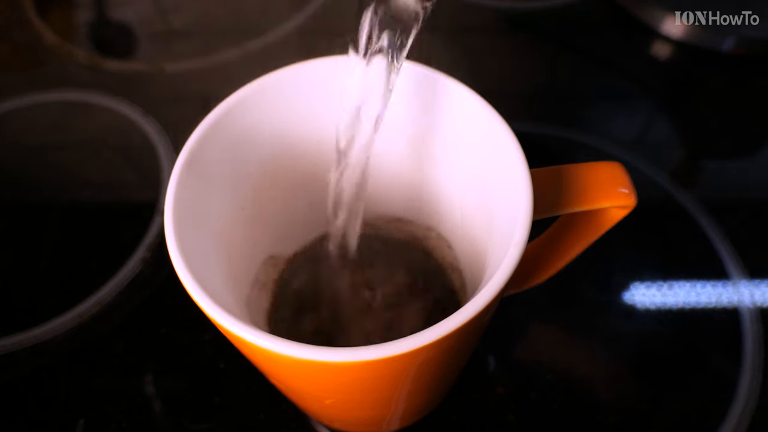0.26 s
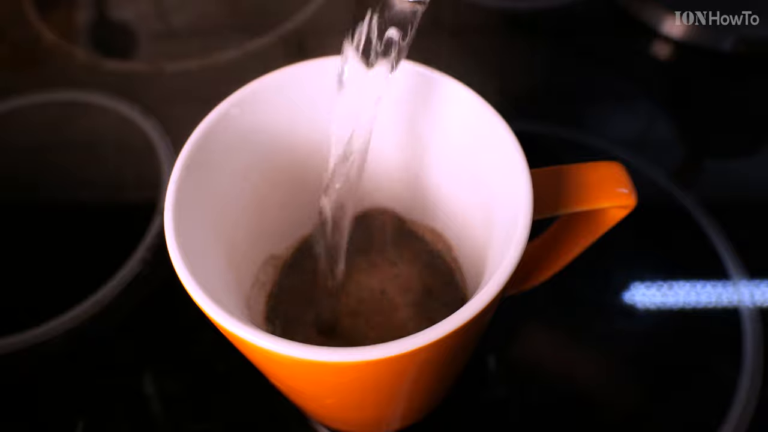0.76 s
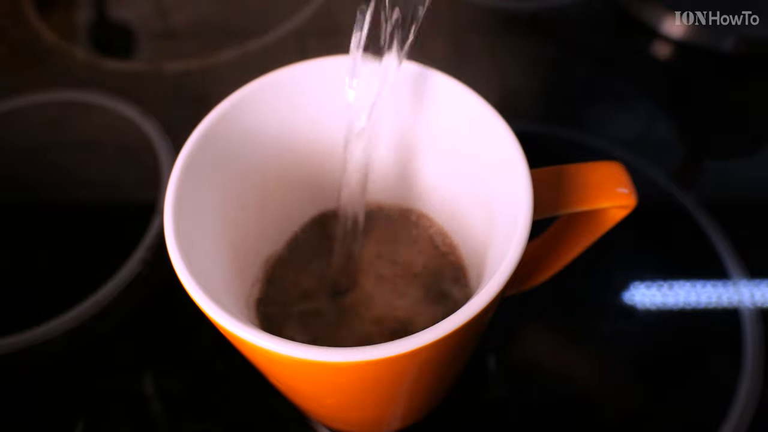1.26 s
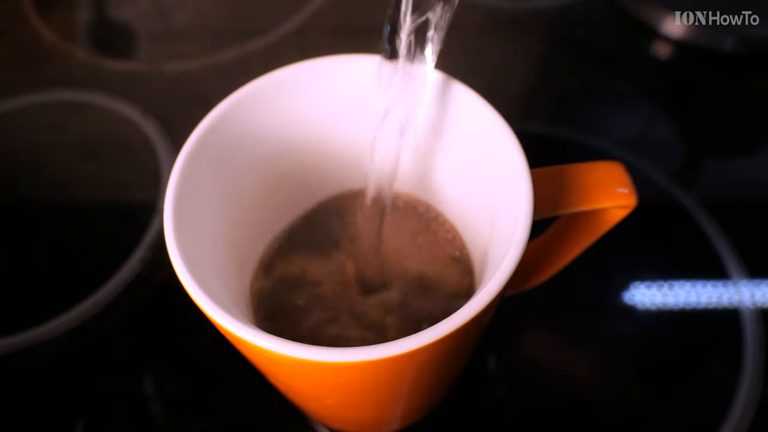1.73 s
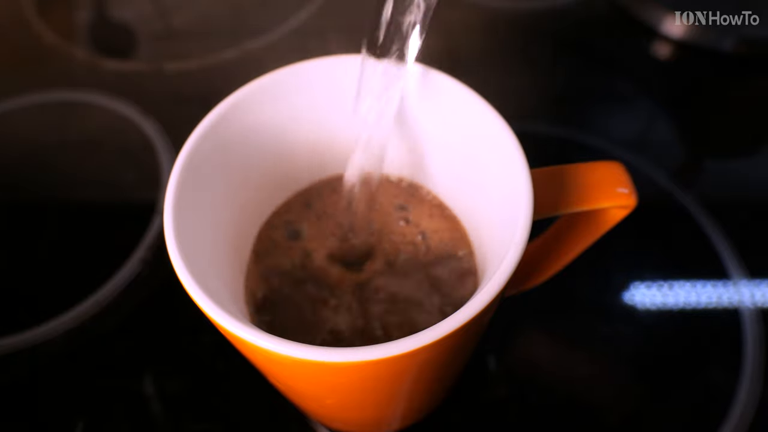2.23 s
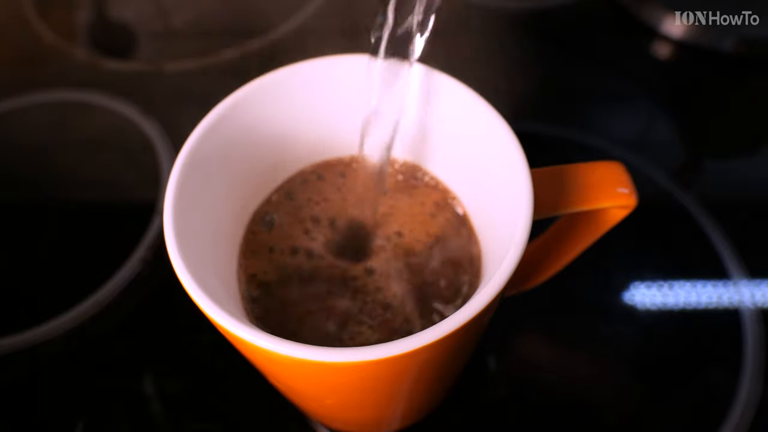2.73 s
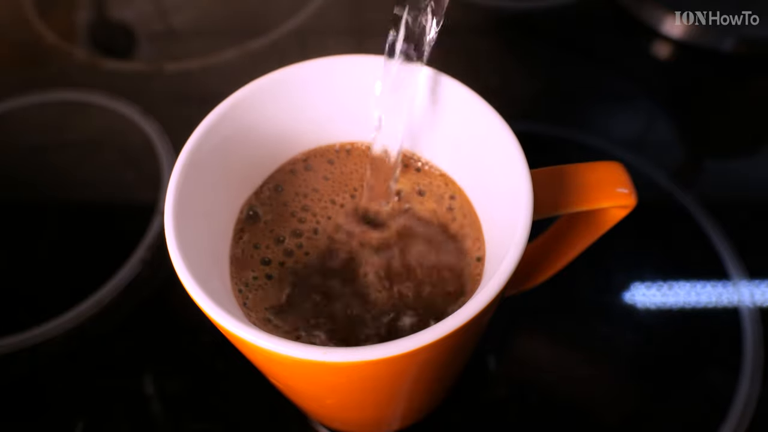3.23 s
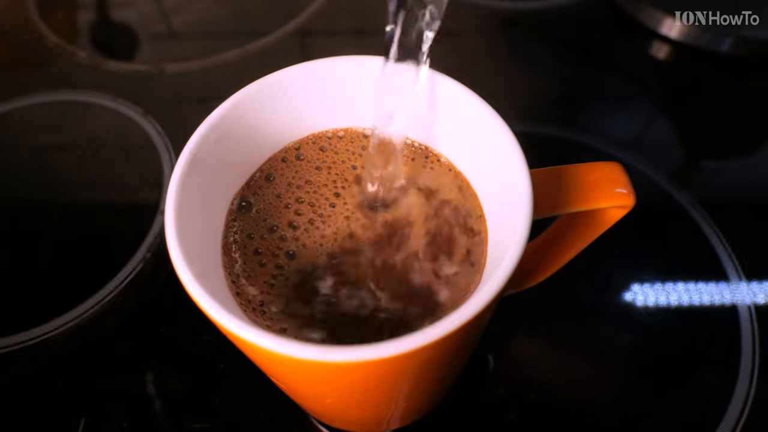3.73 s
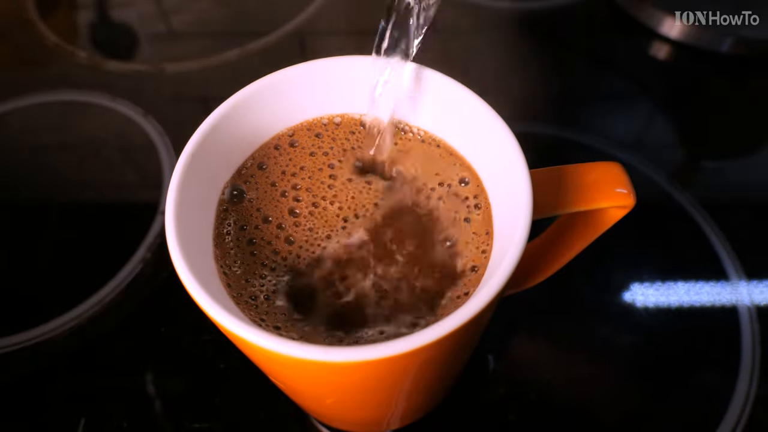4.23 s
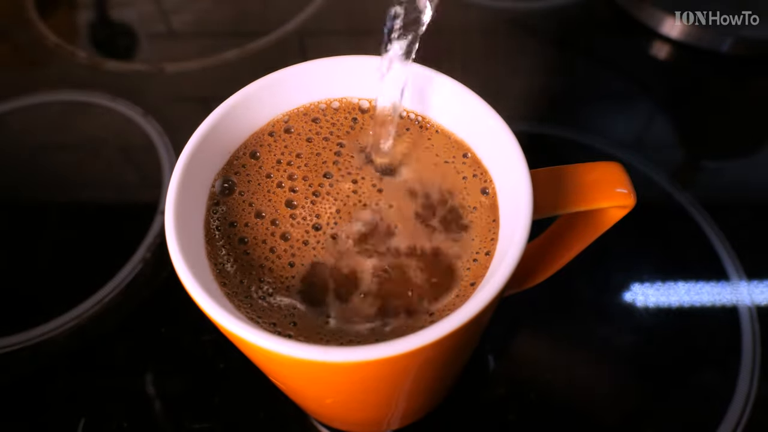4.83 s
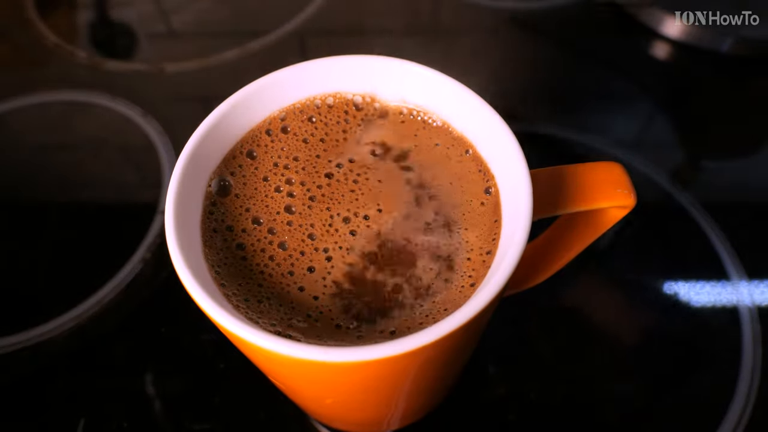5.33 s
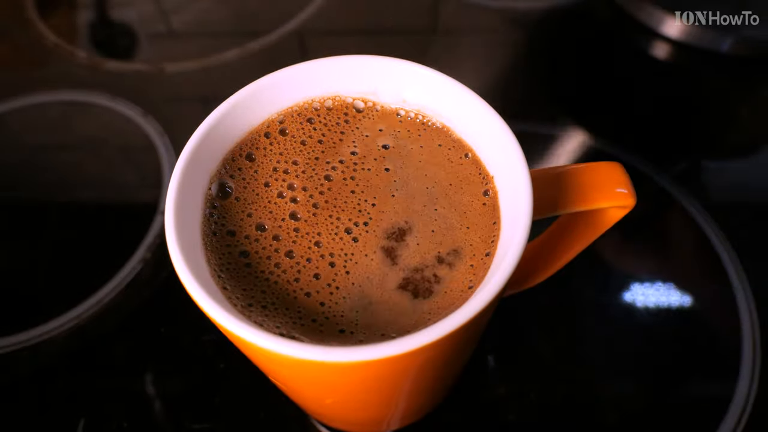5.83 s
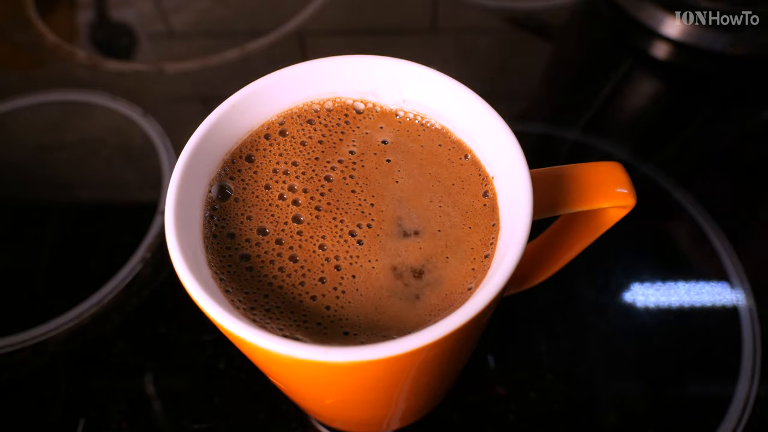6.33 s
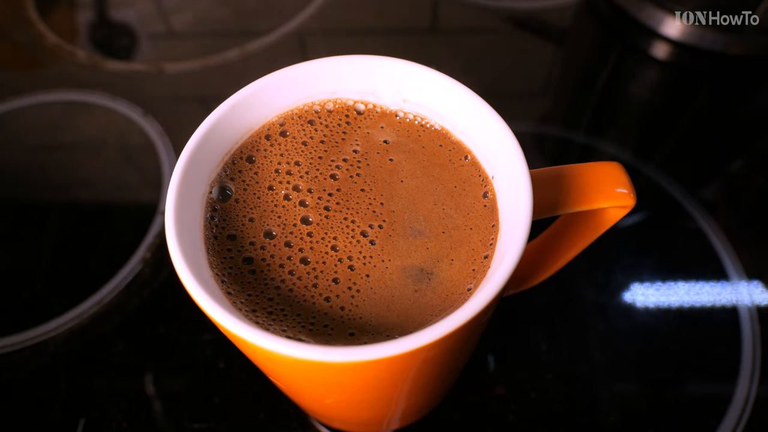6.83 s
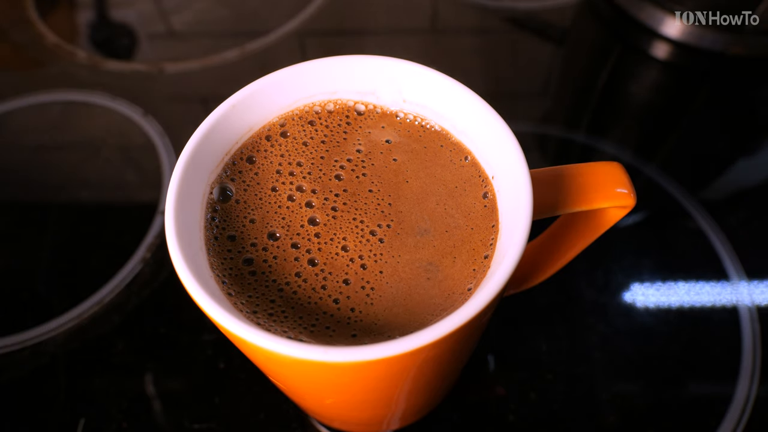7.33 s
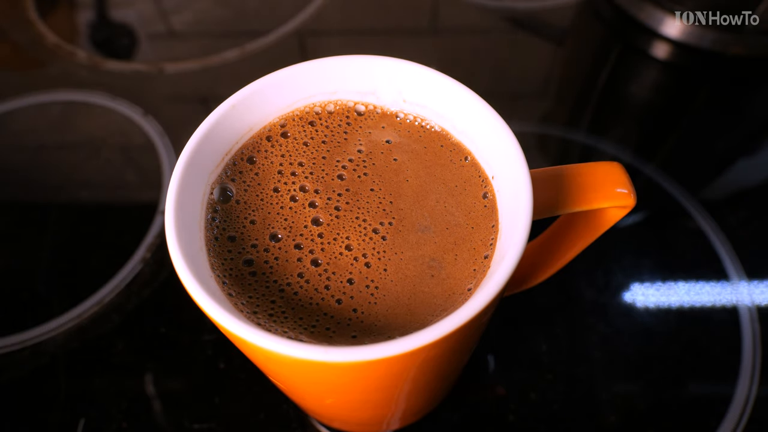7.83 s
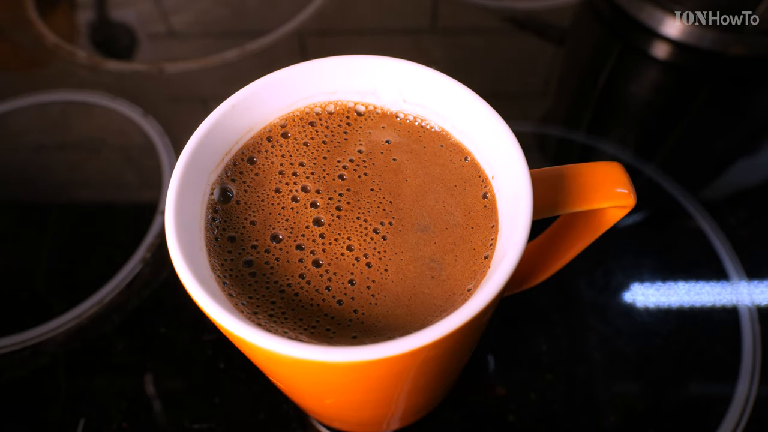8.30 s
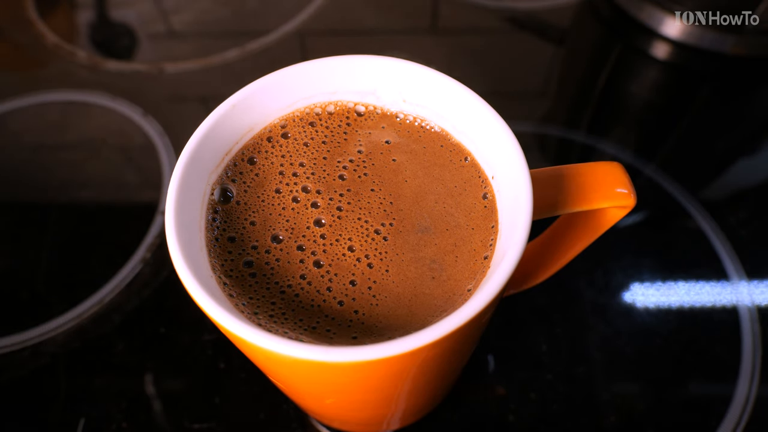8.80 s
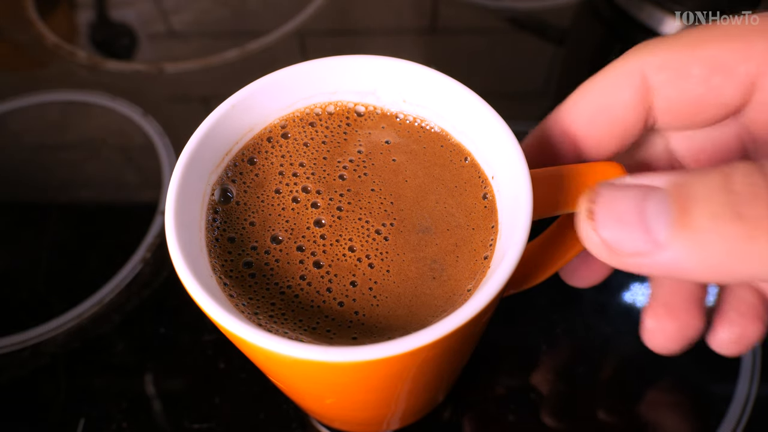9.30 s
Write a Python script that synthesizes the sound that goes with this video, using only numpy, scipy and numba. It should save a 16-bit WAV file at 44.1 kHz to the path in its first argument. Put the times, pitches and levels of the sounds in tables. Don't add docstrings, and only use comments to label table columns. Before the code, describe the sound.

Close to a ceramic mug in a kitchen, hot water pours in with bright splashes, plops and bubbling that climbs in pitch, softening to foamy fizz and small drips. The pour stops, water sloshes in the carried kettle, and it knocks and rattles down on its base. Cloth rustles afterwards while a deep appliance hum grows louder.

```python
import sys
import numpy as np
from scipy import signal
from scipy.fft import rfft, irfft
from scipy.io import wavfile
from numba import njit

SR = 44100
rng = np.random.default_rng(int(sys.argv[2]) if len(sys.argv) > 2 else 0)


def amplitude_ratio(level_db):
    exponent = np.asarray(level_db, float) / 20
    return 10 ** exponent


def transcribe(signal):
    frames = np.atleast_2d(signal).T
    limited = np.clip(frames, -1, 1)
    pcm = np.round(limited * 32767).astype(np.int16)
    wavfile.write(sys.argv[1], SR, pcm)


N = 421596
T_S = np.arange(N) / SR
WALL_HZ = 1100

# [f/Hz, density/dB]
HISS_SPECTRUM = [(82, -13), (140, 0), (264, -8.5), (402, -9.5), (490, -3.5), (563, -8), (759, -11),
                 (1130, -13.5), (1780, -16), (2050, -19.5), (8410, -27), (15000, -36.5), (16200, -40)]
# [f/Hz, left-right likeness]
LIKENESS = [(60, 1.0), (180, 0.54), (550, -0.55), (1650, -0.16), (4970, -0.12), (15000, 0.028)]
# [t/s, level/dB]
DRONE_LEVEL = [(0.0, -21), (0.08, -20), (1.78, -20), (2.82, -17.5), (2.88, -20.5), (3.91, -16), (4.13, -25),
               (4.21, -17), (5.75, -16.5), (6.02, -20.5), (6.63, -11), (6.65, -41), (6.71, -10.5),
               (7.03, -13.5), (7.11, -23.5), (7.32, -14.5), (9.4, -9), (9.56, -11.5)]
# [f/Hz, rms level/dB]
DRONE_PARTIALS = [(111.2, -46.5), (486, -52)]
# [t/s, length/s, level/dB]
SLEEVE_STROKES = [
    (5.963, 0.14, -48),
    (7.13, 0.046, -46),
    (7.415, 0.17, -51),
    (7.551, 0.08, -42),
    (7.702, 0.63, -39.5),
    (8.397, 0.21, -58),
    (9.258, 0.017, -40),
]
# [f/Hz, density/dB]
CLOTH_SPECTRUM = [(880, -44), (1500, -10), (1720, -6.5), (2080, -11), (2910, -9.5), (3770, -9),
                  (8160, -8.5), (14300, -18), (16000, -24)]
# [t/s, slosh level/dB]
SLOSH_LEVEL = [(5.3, -52), (5.37, -41), (5.52, -55), (5.66, -37), (5.71, -35), (5.82, -37.5), (5.9, -34.5),
               (5.98, -26.5), (6.08, -23), (6.26, -24), (6.73, -24.5), (7.03, -30.5), (7.32, -29),
               (9.56, -36)]
# [f/Hz, density/dB]
CARRIED_SPECTRUM = [(76, -9), (130, 0.5), (156, -10), (199, -0.5), (323, -4), (410, -22), (560, -8),
                    (730, -44)]
# [f/Hz, density/dB]
PARKED_SPECTRUM = [(76, 0.5), (130, -11.5), (156, -17.5), (204, -6.5), (295, -14), (339, -3.5),
                   (413, -16.5), (490, -20.5), (560, -27.5), (730, -64)]
# [f/Hz, density/dB]
RUB_SPECTRUM = [(290, -69), (500, 5), (728, -1.5), (820, 7.5), (920, 3), (1050, 2), (1220, -3.5),
                (1430, -5.5), (1850, -7.5), (2180, -12.5), (2420, -5), (2540, -8.5), (2680, -9.5),
                (5000, -21), (6500, -69)]
# [f/Hz, density/dB]
SETTLING_SPECTRUM = [(310, -20), (520, 8.5), (576, -35), (611, 1), (677, 0), (739, -3.5), (1040, -3),
                     (1150, 2.5), (1300, -8), (1520, -12), (1720, -13), (3000, -11.5), (3900, -18),
                     (5000, -50)]
# [f/Hz, density/dB]
BOOM_SPECTRUM = [(45, 10.5), (66, 10), (78, 4), (90, 11), (110, 0.5), (128, 1), (150, -16)]
# [t/s, base level/dB, clack f/Hz, shell level/dB, tick level/dB]
KNOCKS = [(6.187, -29, 790, -23, -47), (6.342, -8, 790, -3.5, -27), (6.425, 0, 2040, -6.5, -29),
          (6.537, -13.5, 656, -1.5, -25), (6.574, -8.5, 856, -9.5, -28), (6.619, -17, 1650, -13, -17.5),
          (6.668, -23, 820, -19, -28.5), (6.69, -18, 850, -16, -38), (6.721, -11, 700, -26, -43),
          (6.801, -14.5, 670, -20, -47), (6.868, -14, 1470, -46, -12.5), (6.925, -8.5, 1550, -13.5, -24.5),
          (7.015, -11.5, 840, -21, -54), (7.077, -17.5, 686, -23.5, -24), (7.13, -23, 683, -23, -28),
          (7.209, -24, 1190, -25, -29)]
# [t/s, peak level/dB, f/Hz]
BOUNCES = [(5.699, -27.5, 826), (6.199, -22.5, 2500), (6.283, -23, 830), (6.351, -18, 803),
           (6.439, -19, 900), (6.585, -18, 630), (6.692, -14, 1050), (6.811, -20.5, 715),
           (6.884, -16.5, 2900), (6.938, -24, 1020), (7.029, -31, 685), (7.859, -34, 2060),
           (8.249, -26, 1800)]
# [f/Hz, level/dB, t60/s]
SHELL_MODES = [(293, -11, 0.22), (326.8, -4.5, 0.21), (446, -9, 0.074)]
# [f/Hz, level/dB, t60/s]
BASE_MODES = [(760, -1, 0.07), (1050, -3, 0.028), (1550, -11, 0.024), (2370, -31, .015)]
# [f/Hz, level/dB, t60/s]
HOLLOW_MODES = [(346, 2.5, 0.079), (920, -7, 0.026), (1545, -7.5, 0.021), (2350, -31, 0.014)]
# [f/Hz, level/dB, t60/s]
THUMP_MODES = [(174, -4, 0.054), (84, -2.5, 0.098)]
# [t/s, f/Hz]
COLUMN_HZ = [(0, 680), (.8, 836), (1.3, 1140), (2.0, 1200), (2.6, 1450), (3.2, 1570), (4.0, 1790),
             (5.5, 1670)]
# [t/s, f/Hz]
OVERTONE_HZ = [(0, 8600), (1.7, 8150), (2.8, 6850), (4.0, 6500), (5.5, 5770)]
# [t/s, level/dB]
MUG_DRIVE = [(0, -11), (1.5, -12), (2.0, -43), (5.5, -28)]
# [f/Hz, level/dB, t60/s]
MUG_MODES = [(3280, 12, 0.04), (4400, 8, 0.03), (4980, 6, 0.05), (5430, 6, 0.05)]
# [f/Hz, level/dB, t60/s]
MOUTH_MODES = [(562, -3.5, 0.026), (1122, -7.5, 0.073), (1540, 5, 0.021), (1800, 0, 0.031)]
# [f/Hz, density/dB]
SPRAY_SPECTRUM = [(1180, -42), (2000, 4.5), (3010, 4.5), (3280, 9.5), (5680, 5), (6880, 3), (9830, -0.5),
                  (16000, -6)]
# [f/Hz, density/dB]
FIZZ_SPECTRUM = [(1180, -29), (2000, 2), (3010, 4), (3680, 11), (4730, 2.5), (6820, 6), (9830, 3.5),
                 (11300, -2.5), (14700, 1), (16000, -13)]
# [t/s, column level/dB, body level/dB, splash level/dB]
PLOPS = [(0.098, -16, -44, -24), (0.167, -14.5, -10.5, -14.5), (0.197, -14, -7.5, -13.5),
         (0.416, -20, -26, -25), (0.702, -25, -10, -26), (0.906, -19, -41, -26), (1.167, -18.5, -8.5, -20),
         (1.336, -13.5, -10, -14), (1.464, -12, -14, -24.5), (1.566, -18, -17, -27.5),
         (1.584, -19, -26, -27), (2.016, -26, -26, -29.5), (2.182, -23.5, -43, -40),
         (2.211, -16.5, -13, -37), (2.331, -19.5, -26.5, -51), (2.439, -17, -18, -28),
         (2.517, -18.5, -30, -27), (2.559, -15.5, -30, -31), (2.612, -10, -15, -22.5),
         (2.679, -17, -29, -34.5), (2.782, -26, -47, -42), (3.064, -27, -43, -39), (3.123, -27, -46, -30.5),
         (3.63, -17, -26, -27), (3.906, -23.5, -26, -32), (3.988, -29, -23.5, -35.5),
         (4.019, -23.5, -26, -31), (5.05, -29.5, -36, -36), (5.107, -27.5, -26.5, -29.5),
         (5.239, -31, -29.5, -35)]
# [t/s, body level/dB, bubble f/Hz]
GLUGS = [(0.368, -16.5, 508), (0.463, -26.5, 526), (0.51, -19.5, 480), (0.606, -24, 537),
         (0.99, -22.5, 503), (1.897, -22, 535), (1.927, -24, 450), (1.949, -25, 526), (2.158, -24.5, 549),
         (2.834, -18, 513), (3.849, -41, 448)]
# [t/s, peak level/dB]
DRIPS = [(0.766, -23), (0.8, -23), (1.712, -19), (1.781, -23), (1.8505, -22), (4.2437, -30), (4.329, -34),
         (4.4127, -35), (4.4958, -28.5), (4.5334, -31.5), (4.58, -29), (4.6183, -34), (4.6596, -32),
         (4.7285, -31), (4.7492, -34), (4.834, -34), (4.8785, -32.5)]
# [t/s, peak level/dB, f/Hz]
SNAPS = [(1.5298, -29, 3300), (1.726, -37, 7420), (1.9926, -31, 9890), (2.258, -26.5, 9890),
         (2.3454, -33, 9530), (2.397, -21.5, 5300), (2.4085, -24, 3480), (2.4681, -33, 9560),
         (3.1634, -28.5, 7000), (3.1945, -29, 10700), (3.358, -25, 3820), (3.367, -17.5, 3870),
         (3.429, -27.5, 3840), (3.7763, -28, 7330), (3.811, -23.5, 6200), (4.15, -30, 2920),
         (4.2116, -15, 3500), (4.289, -23.5, 3820), (4.384, -33, 6470), (4.7199, -25.5, 6940),
         (5.107, -37, 2640), (5.226, -31, 4360)]
# [t/s, peak level/dB, f/Hz]
FLUNG = [(0.035, -9, 5100), (0.083, -14, 4900), (0.1111, -4.5, 6900), (0.123, -13, 4160),
         (0.2648, -31, 3260), (0.3087, -16.5, 3280), (0.3421, -27, 3290), (0.3597, -8, 3460),
         (0.4274, -11, 3270), (0.4617, -19, 3290), (0.52, -20, 3360), (0.607, -14.5, 3260),
         (0.63, -24, 3260), (0.7425, -18, 3280), (0.768, -15, 3380), (0.7983, -15, 3290),
         (0.831, -21, 3200), (0.845, -34, 3320), (0.939, -20.5, 3140), (0.9697, -26, 4360),
         (0.99, -26, 3260), (1.0889, -26, 3200), (1.15, -21, 3600), (1.2125, -22, 4930), (1.229, -19, 3220),
         (1.391, -14, 4400), (1.698, -22.5, 3380)]
# [t/s, peak level/dB, f/Hz]
BLIPS = [(0.009, -13, 780), (0.036, -9, 610), (0.107, -2.5, 775), (0.3, -15, 770), (0.369, -26, 500),
         (0.394, -21, 497), (0.427, -5, 840), (0.479, -9, 546), (0.534, -19, 890), (0.844, -12, 580),
         (0.949, -14, 1070), (1.254, -23, 1090), (1.314, -23, 1130), (1.394, -13, 730), (1.497, -8, 1040),
         (1.549, -14, 1090), (1.646, -13.5, 1050), (1.746, -14, 1120), (1.833, -9.5, 1070),
         (1.993, -12, 1120), (2.103, -12.5, 1140), (2.129, -20, 580), (2.261, -23, 619), (2.304, -17, 1080),
         (2.377, -8.5, 1310), (2.469, -12.5, 1070), (2.547, -13, 1550), (2.718, -25, 1520),
         (2.798, -11, 1730), (2.948, -13, 1540), (3.036, -23, 513), (3.459, -14, 1693), (3.52, -26, 415),
         (3.575, -25, 500)]
# [t/s, peak level/dB, f/Hz]
POCKETS = [(1.171, -19.5, 90), (1.194, -34, 292), (1.345, -14, 99), (1.352, -22, 200), (1.41, -19, 80),
           (1.586, -21, 293), (1.785, -23, 294), (1.815, -21, 306), (1.847, -18, 262), (1.87, -18, 89.5),
           (1.947, -28, 86.6), (2.175, -26, 94), (2.345, -25, 294), (2.399, -26, 290), (2.549, -27, 260)]
# [t/s, peak level/dB]
BEADS = [(0.358, -33), (0.393, -19), (0.673, -25), (0.784, -22), (2.127, -22), (2.277, -24), (2.751, -24),
         (2.872, -24), (2.9194, -42), (2.947, -37), (2.9911, -35), (3.037, -19.5), (3.1394, -21),
         (3.1677, -28), (3.249, -35), (3.276, -21), (3.324, -21), (3.347, -33), (3.385, -33), (3.4032, -21),
         (3.485, -22), (3.5387, -19.5), (3.5817, -20.5), (3.6088, -31), (3.674, -21), (3.6905, -27),
         (3.708, -25), (3.7334, -23), (3.8046, -28), (3.8284, -22), (3.848, -20.5), (3.9293, -27),
         (3.9383, -21.5), (4.0831, -34), (4.144, -31), (4.288, -33), (4.39, -28), (4.456, -31),
         (4.687, -35), (5.21, -37), (5.1394, -40), (5.2889, -43)]


def rms_one(x):
    return x / np.sqrt(np.mean(x ** 2) + 1e-20)


def curve(rows, at_s=T_S):
    return np.interp(at_s, *np.transpose(rows))


def fade(start_s, end_s):
    return np.interp(T_S, [start_s, end_s], [0, 1])


def sounding(start_s, end_s):
    return np.interp(T_S, [start_s - .06, start_s, end_s, end_s + .06], [0, 1, 1, 0])


def at_hz(points, hz):
    f_hz, value = np.transpose(points)
    return np.interp(np.log(hz), np.log(f_hz), value)


def band(x, low_hz, high_hz):
    return signal.sosfilt(signal.butter(2, [low_hz, high_hz], "band", fs=SR, output="sos"), x + 1e-18)


def drift(rate_hz):
    r = np.exp(-2 * np.pi * rate_hz * 40 / SR)
    slow = signal.lfilter([1], [1, -2 * r, r * r], rng.standard_normal(N // 40 + 2002))
    slow = rms_one(slow[2000:])
    return np.interp(np.arange(N) / 40, np.arange(len(slow)), slow)


def coloured(spectrum, channels=1):
    hz = np.arange(1, N // 2 + 2) * SR / N
    inside = (hz > spectrum[0][0]) & (hz < spectrum[-1][0])
    mid, side = rfft(rng.standard_normal((2, N))) * amplitude_ratio(at_hz(spectrum, hz)) * inside
    if channels == 1:
        return rms_one(irfft(mid, N))
    alike = np.clip(at_hz(LIKENESS, hz), -1, 1)
    both = np.sqrt(1 + alike) * mid + np.sqrt(1 - alike) * side * [[1], [-1]]
    return rms_one(irfft(both, N))


def ring(clicks, hz, t60_s):
    r, w = amplitude_ratio(-60 / (t60_s * SR)), 2 * np.pi * hz / SR
    return signal.lfilter([0, np.sin(w)], [1, -2 * r * np.cos(w), r * r], clicks + 1e-18)


def struck(events, modes, level_db, scatter_db):
    at = (np.array(events)[:, 0] * SR).astype(int)
    out = np.zeros(N)
    strengths = rng.normal(0, 1, (len(at), len(modes)))
    for k, (hz, db, t60_s) in enumerate(modes):
        clicks = np.zeros(N)
        clicks[at] = amplitude_ratio(level_db + db + scatter_db * strengths[:, k])
        out += ring(clicks, hz, t60_s)
    return out


def pings(events, level_db, cycles, rise, detune):
    t_s, out = np.arange(2048) / SR, np.zeros(N + 2048)
    for row, db in zip(events, level_db):
        turns = row[2] * detune * t_s
        shape = amplitude_ratio(db - 60 * turns / cycles) * (1 - np.exp(-2 * turns))
        tone = np.sin(2 * np.pi * turns * (1 + rise * turns))
        out[round(row[0] * SR):][:len(t_s)] += shape * tone
    return out[:N]


def bursts(events, level_db, t60_s, tail_db):
    t_s, out = np.arange(2048) / SR, np.zeros((2, N + 2048))
    noise = rng.standard_normal((len(events), 3, len(t_s)))
    tails = amplitude_ratio(tail_db) * (noise[:, :1] + 1.67 * noise[:, 1:]) * amplitude_ratio(-60 * t_s / t60_s)
    tails[:, :, 0] = 1
    for row, db, tail in zip(events, level_db, tails):
        out[:, round(row[0] * SR):][:, :len(t_s)] += amplitude_ratio(db) * tail
    return out[:, :N]


def grains(per_s, spread_db):
    born = rng.random(N) < per_s / SR
    size = amplitude_ratio(spread_db * np.minimum(rng.exponential(1, N), 4))
    return born * size * rng.choice([-1, 1], N)


def dealt_to(clicks, pitches_hz, cycles):
    dealt = rng.integers(0, len(pitches_hz), N)
    return sum(ring(clicks * (dealt == k), hz, cycles / hz) for k, hz in enumerate(pitches_hz))


@njit
def moving_resonance(x, hz, r, sr):
    out = np.zeros(len(x))
    for i in range(2, len(x)):
        feedback = 2 * r * np.cos(2 * np.pi * hz[i] / sr) * out[i - 1] - r * r * out[i - 2]
        out[i] = x[i] - x[i - 2] + feedback
    return out


def resonate(x, hz, width_hz):
    r = np.exp(-np.pi * width_hz / SR)
    return np.array([moving_resonance(v, hz, r, SR) for v in x])


def heard_from(x, lag_ms, smear):
    late = np.arange(N) - np.array([[max(lag_ms, 0)], [max(-lag_ms, 0)]]) * SR / 1000
    out = [np.interp(at, np.arange(N), v) for at, v in zip(late, x * np.ones((2, 1)))]
    for k, lag in enumerate([11, 17, 41, 29]):
        echo = np.r_[1, np.zeros(lag - 1), smear]
        out[k % 2] = signal.lfilter(echo[::-1], echo, out[k % 2])
    return np.roll(out, -49, axis=1)


def hiss():
    return amplitude_ratio(-39 + 2.0 * drift(0.49)) * coloured(HISS_SPECTRUM, channels=2)


def drone():
    level_db = curve(DRONE_LEVEL) + 0.3 * drift(4)
    turn = 2 * np.pi * 37.47 * T_S + 0.37 * drift(3.2)
    out = np.sqrt(2) * amplitude_ratio(level_db) * np.sin(turn + np.array([[-.04], [.04]]))
    for hz, db in DRONE_PARTIALS:
        out = out + np.sqrt(2) * amplitude_ratio(db + 1.0 * drift(1.4)) * np.sin(2 * np.pi * hz * T_S)
    return out


def sleeve():
    attack_s, release_s = 0.017, 0.063
    level = amplitude_ratio(-44) * fade(5.52, 6.02)
    for s, length_s, db in SLEEVE_STROKES:
        end_s = s + length_s
        level = level + amplitude_ratio(db) * (fade(s - attack_s, s) - fade(end_s, end_s + release_s))
    return level * amplitude_ratio(1.28 * drift(8.9)) * coloured(CLOTH_SPECTRUM, channels=2)


def spout_squeak():
    start_s, end_s, hz, db = 9.3, 9.46, 628, -44
    swell = fade(start_s, start_s + 0.042) * (1 - fade(end_s, end_s + 0.075))
    return np.sqrt(2) * swell * amplitude_ratio(db + drift(9.1)) * np.sin(2 * np.pi * hz * T_S + drift(3.4))


def knocks():
    s, base_db, hz, shell_db, tick_db = np.transpose(KNOCKS)
    clacks = pings(KNOCKS, base_db + 0.5, cycles=28.0, rise=0, detune=0.96)
    clatter = band(bursts(KNOCKS, base_db + 9.5, t60_s=0.023, tail_db=-6.5), 610, 1820)
    base = sum(amplitude_ratio(db - 40.0) * ring(clatter, hz, t60_s) for hz, db, t60_s in BASE_MODES)
    ticks = band(bursts(KNOCKS, tick_db + 7.5, t60_s=0.07, tail_db=-11.5), 1100, 7200)
    ticks += band(bursts(KNOCKS, tick_db + 3.5, t60_s=0.012, tail_db=-9.5), 2500, 11800)
    return clacks + clatter + base + ticks


def kettle():
    slosh_db = curve(SLOSH_LEVEL)
    parked, settled = fade(6.19, 6.25), fade(7.05, 7.3)
    present = sounding(SLOSH_LEVEL[0][0], SLOSH_LEVEL[-1][0])
    water = (1 - parked) * coloured(CARRIED_SPECTRUM) + parked * coloured(PARKED_SPECTRUM, channels=2)
    slosh = amplitude_ratio(slosh_db + 2.66 * drift(23)) * water
    rub_db = -33 + 0.56 * (slosh_db + 29.5) - 4.5 * settled
    rub = (1 - settled) * coloured(RUB_SPECTRUM, channels=2)
    rub = rub + settled * coloured(SETTLING_SPECTRUM, channels=2)
    rub = amplitude_ratio(rub_db + 1.7 * drift(13)) * rub
    shell = struck(KNOCKS, SHELL_MODES, np.array(KNOCKS)[:, 3] + 0.5, scatter_db=4.0)
    near = heard_from(present * rub + knocks(), lag_ms=1.174, smear=0.63)
    near += heard_from(present * slosh + shell, lag_ms=0.42, smear=0.16)
    rocking = fade(6.26, 6.58) - settled
    boom_db = -35 + 20 * rocking + 1.0 * drift(1.3)
    boom = present * amplitude_ratio(boom_db) * coloured(BOOM_SPECTRUM, channels=2)
    return near * amplitude_ratio([[1.2], [-1.2]]) + boom


def hollow():
    s, base_db, hz, shell_db, tick_db = np.transpose(KNOCKS)
    low = struck(KNOCKS, HOLLOW_MODES[:1], shell_db - 8.5, scatter_db=3.5)
    high = struck(KNOCKS, HOLLOW_MODES[1:], base_db, scatter_db=2)
    low = low + fade(6.26, 6.58) * struck(KNOCKS, THUMP_MODES, base_db, scatter_db=2)
    return heard_from(low, lag_ms=0.85, smear=0.24) + heard_from(high, lag_ms=1.32, smear=0.43)


def bounces():
    db = np.array(BOUNCES)[:, 1] + 1.5
    rings = pings(BOUNCES, db, cycles=56.0, rise=0, detune=1.0)
    clatter = band(bursts(BOUNCES, db + 3, t60_s=0.042, tail_db=-6.0), 480, 2760)
    return heard_from(rings + clatter, lag_ms=1.26, smear=0.45)


def shadowed(x):
    return x + 0.37 * band(x, 450, 900) * [[-1], [1]]


def stream_levels():
    gush_db = 7 * np.exp(-T_S / 0.22)
    gurgle_db = -38 - 2 * T_S + gush_db - 10.5 * fade(2.9, 4.2)
    spray_db = -40 - 2.5 * T_S + gush_db
    thud_db = -30.5 - 0.14 * T_S - 4.5 * fade(3.0, 3.35)
    return gurgle_db, spray_db, thud_db


def drops():
    s, column_db, body_db, splash_db = np.transpose(PLOPS)
    light_hz = np.maximum(1.14 * curve(COLUMN_HZ, s), .5 * WALL_HZ)
    hz = np.where(body_db > -26, WALL_HZ, light_hz)
    plops = [s, np.maximum(column_db, body_db), hz, body_db, column_db, splash_db]
    s, body_db, hz = np.transpose(GLUGS)
    glugs = [s, body_db, hz, body_db, body_db - 6, body_db - 14]
    s, db = np.transpose(DRIPS)
    drips = [s, db - 2, 1.14 * curve(COLUMN_HZ, s), db - 3.5, db - 2, db - 12.5]
    return np.hstack([plops, glugs, drips]).T + [0, 11, 0, 0, 0, 0]


def patter(level_db):
    decay = amplitude_ratio(-60 / (0.016 * SR))
    puffs = signal.lfilter([1], [1, -decay], abs(grains(60, spread_db=0.0)))
    own = rng.standard_normal((3, N))
    level = (1 - fade(5.0, 5.35)) * amplitude_ratio(level_db - 10.5)
    noise = level * puffs * (own[0] + 1.2 * own[1:]) / np.sqrt(np.mean(puffs ** 2))
    taps = amplitude_ratio(13.5) * band(band(noise, 1000, 1800), 1000, 1800)
    return taps, amplitude_ratio(-5) * band(noise, 2500, 13000)


def beads():
    falls = drops()
    big = struck(falls, MOUTH_MODES[1:], falls[:, 4] - 6, scatter_db=2) * (0.38 + 0.79 * fade(2.1, 4.3))
    big = big + struck(falls, MOUTH_MODES[:1], falls[:, 3] - 3, scatter_db=2)
    small = struck(BEADS, MOUTH_MODES, np.array(BEADS)[:, 1] - 7, scatter_db=2)
    soft = signal.lfilter([.2], [1, -.8], big + small)
    return heard_from(amplitude_ratio(-0.5) * soft, lag_ms=-0.097, smear=0.2)


def spatter():
    falls = drops()
    crack = band(bursts(falls, falls[:, 5] + 4.5, t60_s=0.0026, tail_db=-2.5), 1510, 13800)
    flung_db, blip_db, pocket_db = (np.array(rows)[:, 1] for rows in (FLUNG, BLIPS, POCKETS))
    ticks = band(bursts(FLUNG, flung_db - 4.5, t60_s=0.051, tail_db=-7.5), 2700, 9300)
    ticks = ticks + pings(FLUNG, flung_db - 10.5, cycles=76.0, rise=.001, detune=1)
    strike = ticks + crack * (1 - fade(1.46, 1.8))
    chime = sum(amplitude_ratio(db - 47) * ring(strike, hz, t60_s) for hz, db, t60_s in MUG_MODES)
    blips = pings(BLIPS, blip_db - 8.5, cycles=21.0, rise=0.0045, detune=0.98)
    blips = blips + band(bursts(BLIPS, blip_db + 3, t60_s=0.027, tail_db=-9.0), 390, 1400)
    pockets = pings(POCKETS, pocket_db + 3, cycles=15.0, rise=0.012, detune=0.94)
    return heard_from(crack + ticks + chime + blips, lag_ms=-0.1, smear=0.065) + pockets


def gurgle(flow, falls, slap, taps):
    s, peak_db, hz, body_db, column_db, splash_db = falls.T
    plinks = dealt_to(flow, np.geomspace(1100, 1850, 8), cycles=44.0)
    knock = bursts(falls, column_db + 33, t60_s=0.026, tail_db=-30)
    mids = amplitude_ratio(-18.0) * (0.42 + fade(1.87, 2.3)) * plinks + band(band(knock, 960, 1850), 960, 1850) + taps
    driven = amplitude_ratio(-18.0) * flow + bursts(falls, column_db - 22.5, t60_s=0.049, tail_db=-4.0)
    column = resonate(driven, curve(COLUMN_HZ), 190)
    wall_drive = 0.3 + fade(0.89, 2.1) - fade(2.0, 2.8)
    wall = amplitude_ratio(-36) * ring(wall_drive * (column + mids), WALL_HZ, 0.045)
    bubbles = dealt_to(flow, np.geomspace(380, 760, 8), cycles=19.0)
    glugs = dealt_to(flow, np.geomspace(170, 340, 5), cycles=17.0) * (1 - fade(2.7, 3.5))
    body = amplitude_ratio(-19.0) * bubbles + amplitude_ratio(-25.5) * glugs
    body = body + band(bursts(falls, body_db + 17.5, t60_s=0.015, tail_db=-8.5), 286, 720)
    body = body + amplitude_ratio(-25) * ring(flow * (1 - fade(0.16, 0.37)), 800, 0.12)
    plop_db = np.where(hz > 900, column_db, body_db) + 3.5
    plops = pings(falls, plop_db, cycles=9.6, rise=0.025, detune=1.0)
    mouth = signal.cheby2(6, 30, 2350, fs=SR, output="sos")
    return signal.sosfilt(mouth, mids + column + wall + body + plops + amplitude_ratio(-6.5) * band(slap, 290, 1560))


def spray(clumps, slaps, foam, spray_db):
    ticks = signal.lfilter([1], [1, -.95], abs(slaps))
    droplets = (1 - foam) * coloured(SPRAY_SPECTRUM, channels=2) + foam * coloured(FIZZ_SPECTRUM, channels=2)
    flicker = amplitude_ratio(1.0 * clumps) * (1 + .75 * rms_one(ticks))
    crackle = dealt_to(grains(150, spread_db=4.5), np.geomspace(3300, 13000, 10), cycles=13.0)
    mix = rms_one(droplets * flicker) + amplitude_ratio(-8.5) * rms_one(crackle)
    return sounding(0, 5.5) * amplitude_ratio(spray_db + 2) * mix


def foam_snaps():
    db = np.array(SNAPS)[:, 1]
    tones = pings(SNAPS, db + 14.0, cycles=13.0, rise=0.0065, detune=1)
    clicks = band(bursts(SNAPS, db - 13.5, t60_s=0.06, tail_db=6.0), 2400, 7300)
    return band(tones + clicks, 1730, 15000)


def pour():
    gurgle_db, spray_db, thud_db = stream_levels()
    clumps = drift(30) + 0.55 * drift(8.7)
    dwindle = 1 - 0.48 * fade(4.3, 4.0)
    slaps = grains(400 * dwindle * amplitude_ratio(3.5 * clumps), spread_db=2.0)
    flow = (1 - fade(4.8, 5.3)) * amplitude_ratio(gurgle_db) * rms_one(slaps)
    falls = drops()
    slap = bursts(falls, falls[:, 1] + 3, t60_s=0.0043, tail_db=-1)
    taps, flecks = patter(gurgle_db)
    low = gurgle(flow, falls, slap, taps)
    foam = fade(1.45, 1.98)
    splash = bursts(falls, falls[:, 5] + 6.5, t60_s=0.046, tail_db=-7.5)
    splash = band(splash + amplitude_ratio(-28) * slap, 2280, 8400)
    bright = spray(clumps, slaps, foam, spray_db) + flecks + splash + foam_snaps()
    strike = amplitude_ratio(curve(MUG_DRIVE)) * bright
    ceramic = sum(amplitude_ratio(db - 44.0) * ring(strike, hz, t60_s) for hz, db, t60_s in MUG_MODES)
    loaded = resonate(foam * amplitude_ratio(7.5 * drift(8.1)) * bright, curve(OVERTONE_HZ), 1000)
    thud = sounding(0, 5.5) * amplitude_ratio(thud_db + 2.0 * drift(12.0)) * coloured(BOOM_SPECTRUM, channels=2)
    mug = low + bright + ceramic + amplitude_ratio(-27.5) * loaded
    return heard_from(mug, lag_ms=-0.231, smear=0.0093) + thud


def rim_gap(x):
    depth = 0.7 * fade(0.05, 1.0)
    return x - depth * signal.lfilter(*signal.iirpeak(953, 5, fs=SR), x)


def scene():
    background = hiss() + drone()
    cloth = sleeve() + spout_squeak()
    metal = kettle() + hollow() + bounces()
    water = pour() + spatter() + beads()
    return background + cloth + shadowed(metal) + rim_gap(water)


def gain_control(x):
    threshold_db, share, recover_db_per_s = -5, 0.3, 43
    level_db = 20 * np.log10(abs(band(x, 200, 8000)).max(axis=0) + 1e-6)
    climb_db = recover_db_per_s * T_S
    held_db = np.maximum.accumulate(level_db + climb_db) - climb_db
    over_db = np.maximum(held_db - threshold_db, 0)
    return x * amplitude_ratio(-share * signal.lfilter([.004], [1, -.996], over_db))


def low_pass(x):
    return signal.sosfilt(signal.butter(12, 16510, fs=SR, output="sos"), x)


def record(dry):
    edge = signal.cheby2(14, 60, 16000, fs=SR, output="sos")
    mix = signal.sosfilt(edge, np.clip(gain_control(dry), -.99, .99))
    return low_pass(mix)


dry = scene()
out = record(dry)
transcribe(out)
```